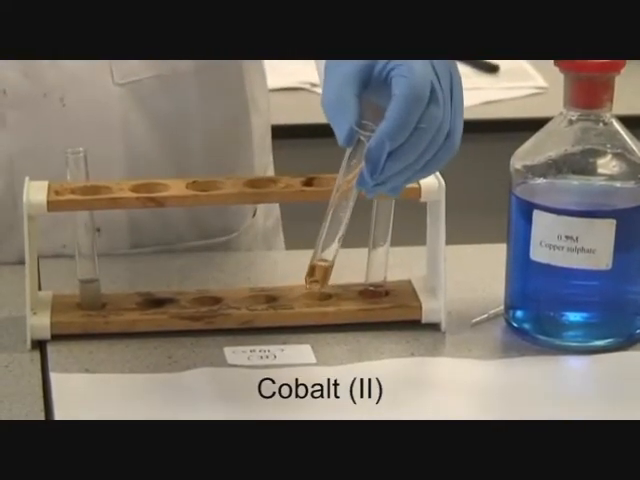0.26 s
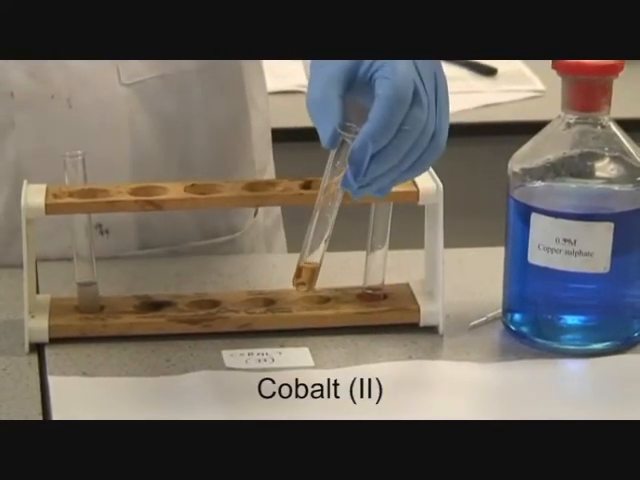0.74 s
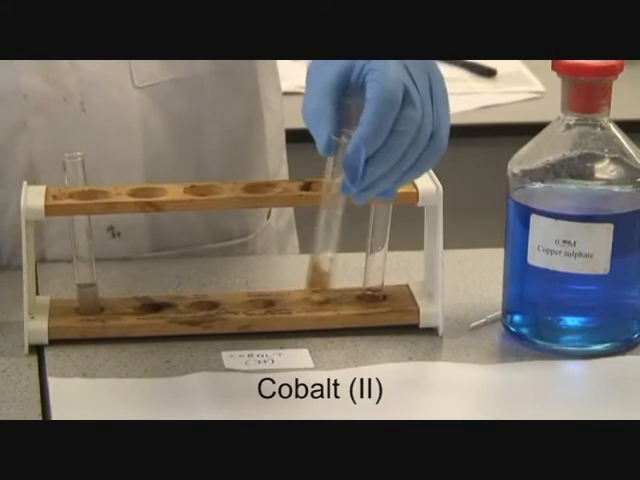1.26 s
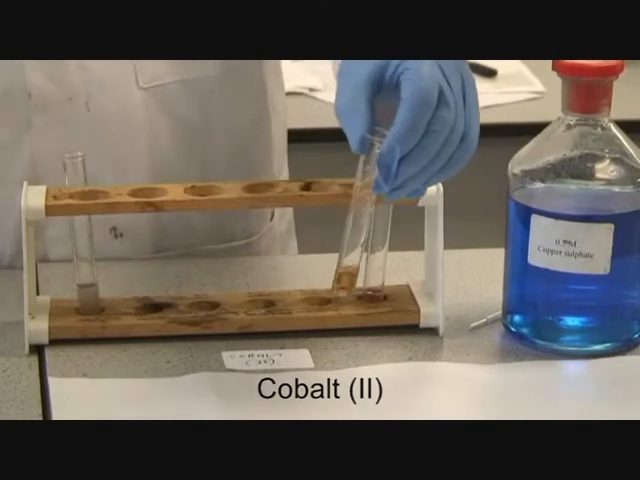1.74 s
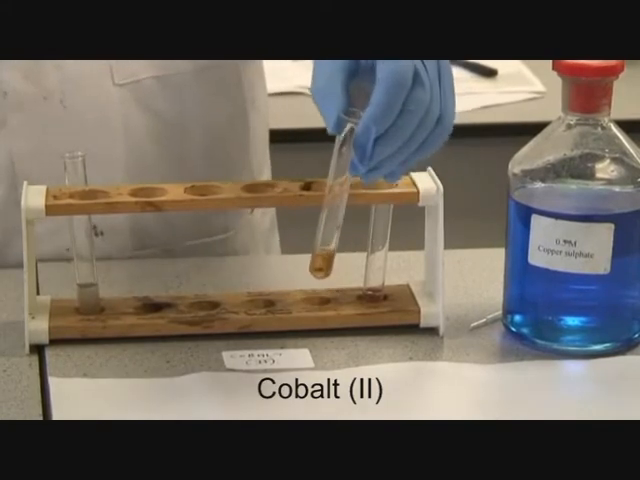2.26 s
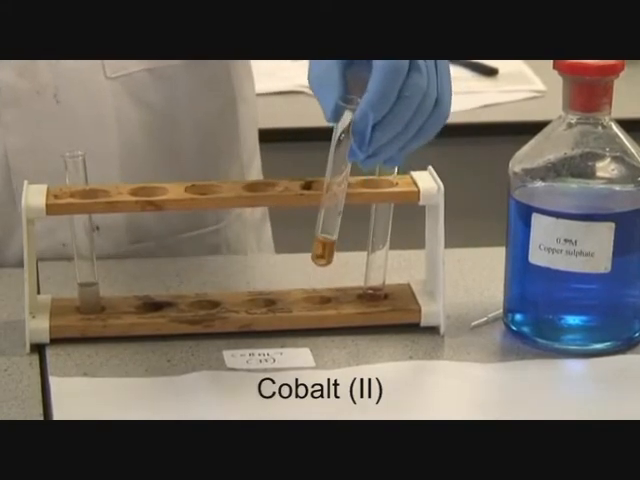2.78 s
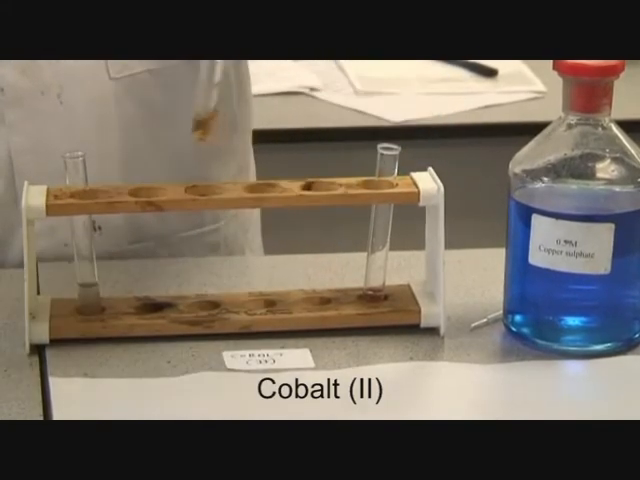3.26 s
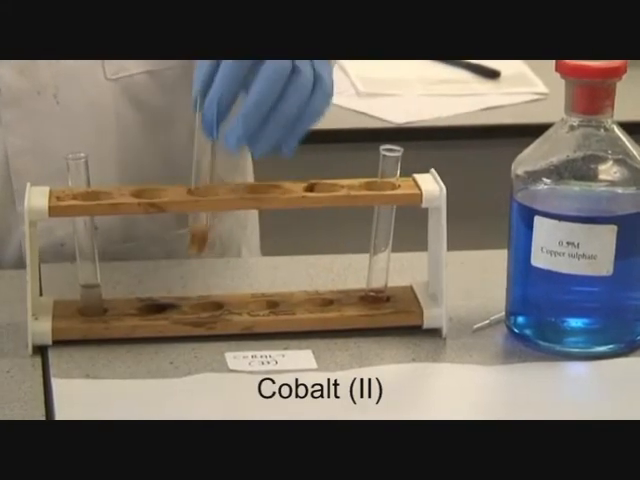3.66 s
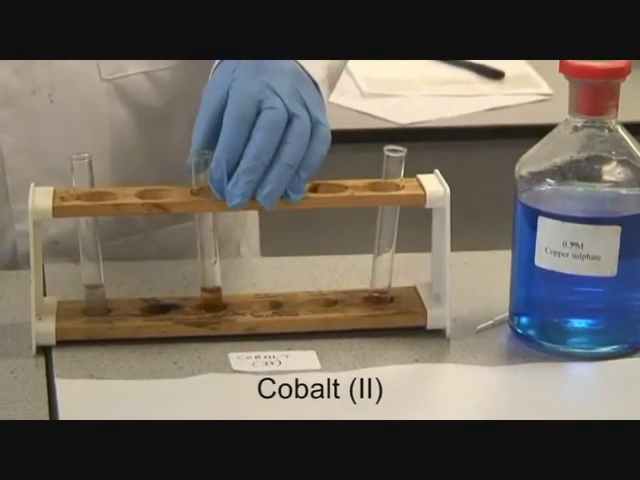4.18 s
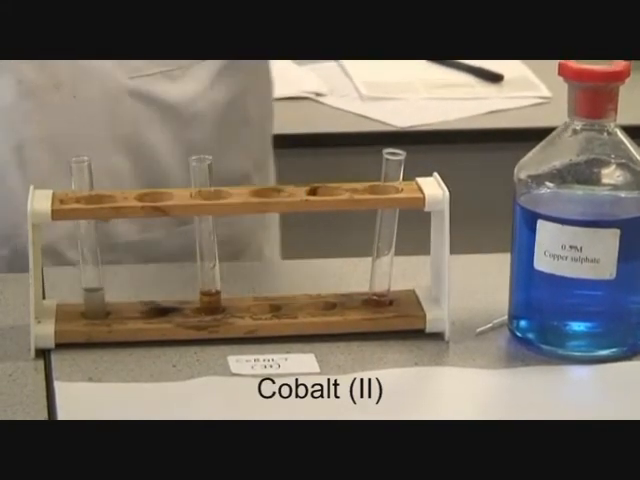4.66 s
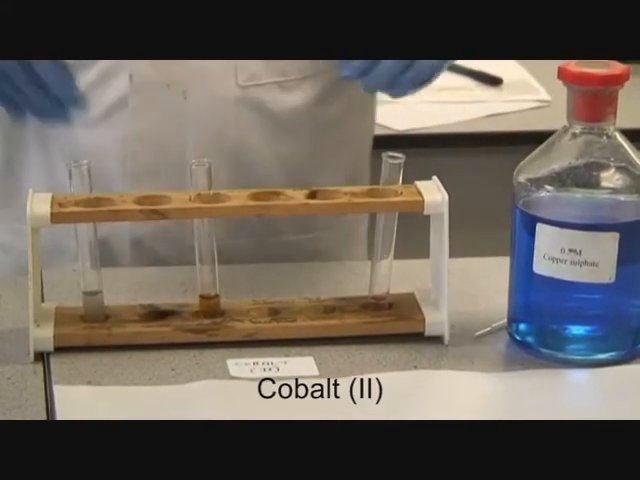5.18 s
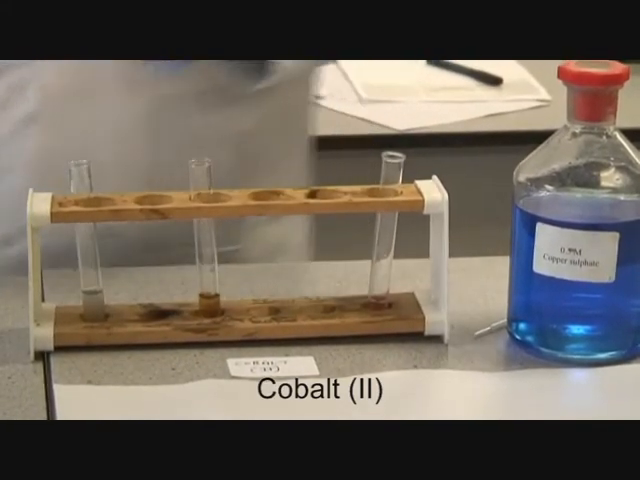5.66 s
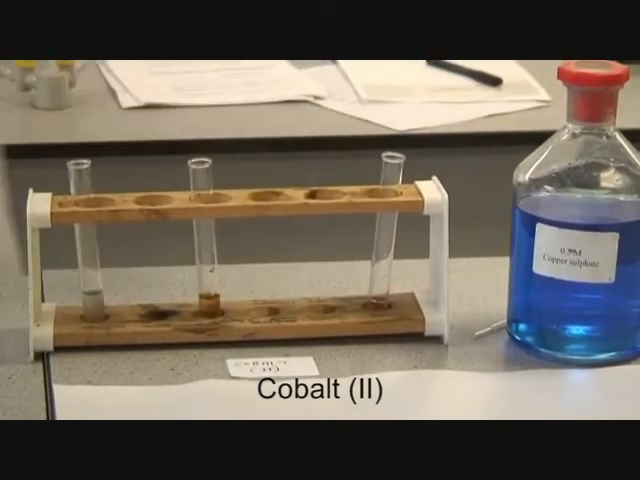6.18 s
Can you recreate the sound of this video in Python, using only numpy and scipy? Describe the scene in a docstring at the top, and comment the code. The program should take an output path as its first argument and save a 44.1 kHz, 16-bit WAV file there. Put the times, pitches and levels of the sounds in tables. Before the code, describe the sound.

A quiet laboratory room with soft low ventilation, a faint steady mains hum and light microphone hiss throughout. From about 0.6 to 1.0 s a glass tube rattles in a wooden rack: a dry knock with a tiny glassy tick, irregular smaller knocks, short gritty scrapes, and a firmer woody knock at 1.0. Between 1.3 and 2.0 only very faint cloth rubbing. A light tap with a slight glass ring at 2.4, a brief scrape near 2.65, then at 2.8 the loudest event, a bright hard wooden clack with a short hollow tube ring and room tail. Quiet until faint taps at 4.1 to 4.4. From 4.6 to 5.3 sleeve and glove rustles come in bursts, with small clicks. Soft dull bumps at 5.85, a crisp hard double tick at just under 6.0, then faint rustling until the end, around 6.3.

```python
"""A glass test tube, moved by a gloved hand, knocks and slides in a wooden rack on a laboratory bench.
Blows excite decaying modes of board and tube, hard contacts tick, and friction noise drives resonances.
A coat sleeve and gloves rustle as noise bursts shaped in spectrum and level. Two echoes and a diffuse
tail make the room; shaped noise and sines give ventilation, mains hum and microphone hiss."""
import sys
import numpy as np
from scipy import signal
from scipy.fft import rfft, irfft, next_fast_len
from scipy.io import wavfile
from scipy.ndimage import uniform_filter1d

SR = 44100
rng = np.random.default_rng(int(sys.argv[2]) if len(sys.argv) > 2 else 0)


def output_pcm(signal):
    """Save a mono or channel-first signal as 16-bit PCM at the path in sys.argv[1].

    Samples are clipped to [-1, 1] before scaling.
    """
    pcm = np.clip(np.atleast_2d(signal).T, -1, 1) * 32767
    wavfile.write(sys.argv[1], SR, np.round(pcm).astype(np.int16))


N = 283122  # length in samples

# modes of the rack's board with the bench under it: f/Hz, relative level/dB, t60/s
WOOD_MODES = [(258, -0.5, 0.034), (295, -18, 0.016), (352.4, -1, 0.076), (424, -12, 0.073),
              (494.5, 2, 0.053), (576, -2.5, 0.084), (666, 4, 0.051), (856, 5.5, 0.013), (920, -1.5, 0.052),
              (967, 5, 0.025), (1092, -0.5, 0.06), (1207, -8.5, 0.092), (1389, 4.5, 0.024),
              (1575, -3.5, 0.061), (1833, 0, 0.039), (2010, -6, 0.026), (2120, 9, 0.017),
              (2567, 5.5, 0.021), (2880, 0, 0.028), (3284, -3, 0.022), (3600, -11, 0.024),
              (4000, -2, 0.013), (4780, -0.5, 0.0053), (5130, -6, 0.053), (6050, -8, .012)]
# modes of the tube, lowest the air column inside it: f/Hz, relative level/dB, t60/s
GLASS_MODES = [(1090, 0, 0.12), (3700, 0, 0.069), (5390, 10, 0.095), (6030, 2, 0.083), (6500, -6, 0.11),
               (9500, 0, .15)]


def knock(peak_db, centre_hz, octaves, place):
    """Modal excitation: a soft blow, then uneven chatter; each mode is weighted by its shape at the place."""
    mode_hz = np.transpose(WOOD_MODES)[0]
    shape = np.cos(np.pi * np.arange(1, len(WOOD_MODES) + 1) * place)
    reach = near_to(mode_hz, centre_hz, octaves) + 0.019  # every mode is stirred a little
    board = ring(WOOD_MODES, (shape + .5 * np.sign(shape)) * reach)

    t = np.arange(1500) / SR
    u = 2 * np.pi * 1.82 * centre_hz * 2 ** octaves * t[:300]
    contact = u * np.exp(-u)  # a longer contact is duller
    blow = peaked(np.convolve(contact, board), peak_db)

    chatter_s = 2.63 / centre_hz  # decay by 1/e in 2.63 cycles of the strongest region
    force = 1.09 * rng.standard_normal(len(t)) * np.exp(-t / chatter_s) / np.sqrt(chatter_s * SR)
    force[0] = 1  # the blow itself
    return signal.fftconvolve(force, blow)


def tick(peak_db, hz, cycles):
    """Impact of hard bodies: a small contact spot radiates a short, heavily damped oscillation."""
    turns = np.arange(600) / SR * hz
    envelope = (turns / cycles) ** 2 * np.exp(-4.5 * turns / cycles)
    return peaked(np.sin(2 * np.pi * turns) * envelope, peak_db)


def clink(peak_db, centre_hz, grip):
    """Damped free vibration: tube modes near the given region sound; the grip sets how long they ring."""
    modes = np.array(GLASS_MODES) * [1, 1, grip]
    modes[0, 0] = np.clip(centre_hz, 900, 1200)  # the fingers at the mouth shift the air column
    tube = ring(modes, near_to(modes[:, 0], centre_hz, octaves=0.03))
    onset = np.minimum(np.arange(len(tube)) / 60, 1)
    return peaked(tube * onset, peak_db)


def slide(hold, swell_db, hiss_db, hiss_hz, ring_hz, board_db, board_hz):
    """Friction-driven resonance: slips on the rim hiss in one band, ring the glass and shake the board."""
    t, shape = stroke(rise=.016, hold=hold, fall_db_per_s=1200, swell_db=swell_db)
    slips = gritty(len(t), per_s=2500, spread_db=0.0, smooth=0.45)

    # hiss and rumble drop in pitch as the tube slides
    hiss_sag_hz_per_s, rumble_sag_hz_per_s = 1600, 880
    falling_hz = hiss_hz - hiss_sag_hz_per_s * (t - t.mean())
    band = resonate(resonate(slips, falling_hz, 900), falling_hz, 940)
    hiss = patchy(band, spread_db=2.8)

    top_mode_hz = GLASS_MODES[-1][0]
    tube = evened(resonate(slips, ring_hz, 130)) + 0.46 * evened(resonate(slips, top_mode_hz, 130))

    wood = sum(gain_of(db) * resonate(slips, hz, 130) for hz, db, _ in WOOD_MODES)
    board = evened(resonate(wood, board_hz - rumble_sag_hz_per_s * t, 180))

    rim = gain_of(hiss_db) * (hiss + gain_of(-9) * tube)
    return shape * (rim + gain_of(board_db) * board)


def rustle(rise, hold, level_db, folds_db):
    """Friction noise: rubbing cloth and rubber give middle grain, fine treble and duller folds below."""
    # spectrum of the rub: f/Hz, relative level per Hz/dB
    cloth = [(710, -5), (1200, 0.5), (1550, -5), (1700, -3), (1890, -3.5), (2510, 1.5), (3530, -1),
             (4640, 1.5), (5320, -8.5), (6170, -7), (7010, -22), (7710, -13.5), (8660, -19), (11300, -14),
             (15000, -46)]
    t, shape = stroke(rise, hold, fall_db_per_s=389)
    rub = coloured(gritty(len(t), per_s=2500, spread_db=2.5, smooth=1.3), cloth)
    rub = patchy(rub, spread_db=2.9)
    fine = evened(signal.sosfilt(signal.butter(4, 7000, "high", fs=SR, output="sos"), rub))
    grain = evened(signal.sosfilt(signal.butter(4, 7000, "low", fs=SR, output="sos"), rub))
    folds = evened(resonate(rng.standard_normal(len(t)), 370, 1050))
    mixed = grain + gain_of(folds_db) * folds + gain_of(-9.5) * fine
    return gain_of(level_db) * shape * mixed


def room(x):
    """Reverberation: two early reflections, then a dense tail with a decay time for each frequency."""
    # tail: f/Hz, t60/s, relative level/dB
    tail_table = [(237, 0.64, 1.5), (660, 0.39, -2.5), (1040, 0.48, -6), (1630, 0.3, -2),
                  (3130, 0.45, -7.5), (6040, 0.2, -8), (12200, 0.44, -1.5)]
    # reflections from bench and back wall: delay t/s, level/dB
    echoes = [(.004, -12), (.009, -17)]
    taps = np.zeros((2, SR // 2))
    at = np.arange(300, SR // 2 - 20, 20) + rng.integers(0, 20, (2, (SR // 2 - 301) // 20))
    np.put_along_axis(taps, at, rng.choice([-1., 1.], at.shape), 1)
    # close microphones hear nearly the same tail
    taps = taps[0] + 0.0043 * taps[1] * np.array([[1], [-1]])

    hz, t, z = signal.stft(taps, SR, nperseg=256)
    t60 = read([(f, s) for f, s, _ in tail_table], hz)[:, None]
    level_db = read([(f, db) for f, _, db in tail_table], hz)[:, None]
    response = signal.istft(z * gain_of(level_db - 60 * t / t60), SR, nperseg=256)[1]
    response *= gain_of(-4.0) / np.linalg.norm(response[0])
    for k, (s, db) in enumerate(echoes):
        response[:, round(s * SR)] += (-1) ** k * gain_of(db)  # the second is inverted
    return x + signal.fftconvolve(x[None], response, axes=1)[:, :N]


def ventilation():
    """Broadband flow noise: coloured noise whose level swells slowly and irregularly."""
    # spectrum: f/Hz, relative level per Hz/dB
    air = [(12, -58), (20, -4), (38, -22.5), (120, -11), (155, -8.5), (221, -9), (300, -9), (341, -5),
           (378, -11.5), (419, -9), (476, -16), (1050, -19), (1500, -23), (2210, -25.5), (9000, -35.5),
           (11700, -76.5), (19800, -120)]
    t = np.arange(N) / SR
    swell = evened(sum(np.sin(2 * np.pi * (f * t + rng.random())) / np.sqrt(f)
                       for f in np.geomspace(.2, 3, 12)))
    return coloured(rng.standard_normal(N), air) * gain_of(-61 + 0.6 * swell)


def mains_hum():
    """Line spectrum: narrow noise bands waver as hum, and steady sines add thin tones."""
    # hum lines: f/Hz, rms level/dB, width/Hz
    lines = [(149.8, -62, 1.4), (199, -72, 9), (306, -68.5, 14), (591, -79, 3.4), (906, -88, 2.7),
             (1130, -81, 7.2)]
    # thin tones: f/Hz, rms level/dB
    buzz = [(3300, -93), (3600, -93), (4200, -92), (4500, -93), (9900, -93), (11100, -94)]
    t = np.arange(N) / SR
    hum = np.zeros(N)
    for k, (hz, db, width) in enumerate(lines):
        line = evened(resonate(rng.standard_normal(N), hz, width))
        if k == 0:  # the strongest line is mostly a steady tone, over the level listed
            line = np.sqrt(2) * np.sin(2 * np.pi * hz * t) + 0.36 * line
        hum += gain_of(db) * line
    for hz, db in buzz:
        hum += gain_of(db) * np.sqrt(2) * np.sin(2 * np.pi * hz * t)
    return hum


def ring(modes, weights):
    """Modal superposition: exponentially decaying sines, a quarter second long."""
    hz, db, t60 = np.transpose(modes)
    t = np.arange(SR // 4)[:, None] / SR
    return (weights * gain_of(db - 60 * t / t60) * np.sin(2 * np.pi * hz * t)).sum(1)


def near_to(hz, centre_hz, octaves):
    """Selective excitation: Gaussian weight of modes around a centre on the octave scale."""
    return np.exp(-.5 * (np.log2(hz / centre_hz) / max(octaves, .03)) ** 2)


def gritty(size, per_s, spread_db, smooth):
    """Stick-slip friction: random uneven micro-slips over a smooth noise."""
    slips = gain_of(spread_db * np.minimum(rng.exponential(1, size), 5)) * (rng.random(size) < per_s / SR)
    return evened(slips * rng.standard_normal(size)) + smooth * rng.standard_normal(size)


def stroke(rise, hold, fall_db_per_s, swell_db=0):
    """Envelope linear in dB: rises from silence, holds with a swell centred on 0 dB, and falls."""
    depth_db = 26
    corners = np.cumsum([0, rise, hold, depth_db / fall_db_per_s])
    t = np.arange(0, corners[-1], 1 / SR)
    level_db = np.interp(t, corners, [-depth_db, -swell_db / 2, swell_db / 2, -depth_db])
    return t, gain_of(level_db) - gain_of(-depth_db)


def patchy(x, spread_db):
    """Uneven pressure: the level wanders in patches of time and pitch; rms 1."""
    z = signal.stft(x, nperseg=256)[2]
    patches = uniform_filter1d(rng.standard_normal(z.shape), size=6, axis=0)
    patches = evened(uniform_filter1d(patches, size=5, axis=1))
    return evened(signal.istft(z * gain_of(spread_db * patches), nperseg=256)[1][:len(x)])


def resonate(x, hz, width):
    """Heterodyne resonance of peak gain 1: shift hz down to zero, smooth, and shift back."""
    turn = np.exp(2j * np.pi * np.cumsum(hz * np.ones(len(x))) / SR)
    r = np.exp(-np.pi * width / SR)
    return 2 * (turn * signal.lfilter([1 - r], [1, -r], x / turn + 1e-18)).real


def coloured(x, points):
    """Spectral shaping: weights x by a level curve in dB over frequency, then sets rms 1."""
    length = x.shape[-1]
    size = next_fast_len(length)
    gain = gain_of(read(points, np.fft.rfftfreq(size, 1 / SR)))
    return evened(irfft(rfft(x, size) * gain, size)[..., :length])


def read(points, hz):
    """Interpolates a curve on a log-frequency axis."""
    f, value = np.transpose(points)
    return np.interp(np.log(hz + 1), np.log(f + 1), value)


def gain_of(db):
    """Level to amplitude: 20 dB is a factor of ten."""
    return 10 ** (np.asarray(db) / 20)


def evened(x):
    """Power normalisation: scales to rms 1."""
    return x / np.sqrt(np.mean(x ** 2) + 1e-20)


def peaked(x, peak_db):
    """Peak normalisation: scales to a peak level."""
    return gain_of(peak_db) * x / abs(x).max()


def add(mix, s, sound):
    """Linear superposition: mixes a sound in at a time in seconds."""
    part = mix[round(s * SR):][:len(sound)]
    part += sound[:len(part)]


def scene():
    """Superposition: rack, tube and cloth excite the room, over the background."""
    # knocks on wood: t/s, blow's peak level/dB, strongest region f/Hz, breadth/octaves, place on board (0-1)
    knocks = [(.582, -23, 760, 1.17, 0.4), (.597, -31.5, 890, 0.46, .21), (.621, -38, 750, 0.45, 0.29),
              (.650, -43, 990, 0.36, 0.25), (.660, -28.5, 965, 0.69, .33), (.665, -29, 980, 0.29, .38),
              (.712, -30.5, 790, .97, 0.4), (.795, -36, 745, .2, 0.17), (.847, -27.5, 780, 0.4, 0.09),
              (.866, -39, 760, 1, .51), (.906, -33.5, 600, 0.37, .15), (.983, -18.5, 835, 0.78, .32),
              (2.421, -30, 1180, 0.59, 0.08), (2.694, -38.5, 730, .63, 0.43), (2.769, -38, 660, 0.71, 0.5),
              (2.776, -42, 700, 0.55, 0.37), (2.81, -26.5, 720, 0.33, 0.07), (2.814, -27, 724, 0.44, 0.21),
              (2.821, -13, 1170, 0.88, .37), (2.8238, -15, 1330, 1.5, 0.32), (4.079, -48, 605, .4, 0.31),
              (4.306, -41.5, 1020, 0.9, .4), (4.38, -50, 1070, 0.81, .39), (4.624, -36.5, 990, .45, .2),
              (4.812, -43, 520, 0.28, 0.12), (5.846, -35, 281, 0.76, 0.08), (5.865, -41, 420, 1.9, 0.14),
              (5.984, -36.5, 1080, 1.4, .32), (5.989, -43, 980, .47, .3), (6.018, -53, 516, .45, 0.23),
              (6.275, -51.5, 1130, 0.69, 0.44)]
    # hard ticks of glass rims and gloves: t/s, peak level/dB, f/Hz, length/cycles
    ticks = [(.5825, -27, 3430, 1.9), (.5826, -42, 6500, 3.2), (.651, -55, 4500, 1.5),
             (.712, -38.5, 3700, 1), (2.421, -34, 4430, 1.5), (2.694, -50, 6000, 1.2),
             (4.585, -46, 2900, 5.5), (4.624, -41.5, 3800, 1.4), (4.634, -36, 4470, 0.44),
             (4.811, -33, 4360, 2.5), (4.998, -46, 3340, 2.8), (5.07, -43, 4000, 1),
             (5.235, -50, 3040, 1.4), (5.866, -49, 5000, 1.5), (5.9848, -20, 4180, 1.18),
             (5.9893, -27.5, 4330, 1.1)]
    # rings of the tube: t/s, peak level/dB, mode region f/Hz, grip as a factor on t60
    clinks = [(.584, -50.5, 5383, 1.9), (.585, -48, 3671, 0.79), (.586, -62, 6540, .9),
              (.651, -59, 6540, .9), (.679, -68, 6540, .9), (.712, -59, 7060, 0.78),
              (2.422, -46, 5383, 0.37), (2.423, -56, 6170, 0.72), (2.426, -43, 1124, 0.51),
              (2.83, -33, 1007, 1.9), (4.312, -50.5, 1059, 1.2), (4.382, -57, 1064, 0.81)]
    # slides of the tube in its hole: start t/s, hold/s, swell over the hold/dB, hiss level/dB,
    # hiss band f/Hz, ring f/Hz as the grip shifts it, board rumble level/dB, rumble's starting f/Hz
    slides = [(.62, 0.048, -7, -66, 3620, 6530, -49, 880),
              (.762, 0.093, 5.5, -57.5, 3650, 6380, -51.5, 710),
              (.886, 0.034, -1, -84, 3700, 6280, -58, 570), (2.635, .035, -4, -71.5, 3850, 6150, -61, 1150),
              (2.76, 0.031, -8, -54, 4140, 6000, -47.5, 670)]
    # strokes of sleeve and gloves: start t/s, rise/s, hold/s, grain level/dB, folds against grain/dB
    rustles = [(1.325, 0.019, 0.0055, -68, 4), (1.42, 0.041, .13, -69.5, 0.5), (1.8, 0.16, 0.069, -72, -2),
               (4.628, 0.0073, 0.0024, -58, -2.5), (4.655, 0.042, 0.14, -56.5, -14),
               (4.788, 0.015, 0.011, -50, 2.5), (4.86, 0.052, 0.089, -62.5, -12),
               (5.045, 0.014, 0.11, -63, -2), (5.19, 0.039, .12, -59.5, -14), (5.995, 0.011, 0.22, -77, 10),
               (6.22, 0.036, 0.037, -65, 0), (6.29, 0.038, 0.031, -59, -8)]
    near = np.zeros(N)
    for table, source in [(knocks, knock), (ticks, tick), (clinks, clink), (slides, slide), (rustles, rustle)]:
        for s, *settings in table:
            add(near, s, source(*settings))
    # small things radiate little bass
    near = signal.sosfilt(signal.butter(2, 190, "high", fs=SR, output="sos"), near)
    return room(near) + ventilation() + mains_hum()


def record(dry):
    """Noise floor and band limit: two microphones add hiss, part of it shared, then a low-pass acts."""
    # hiss of each microphone: f/Hz, relative level per Hz/dB
    hiss = [(12, -35.5), (20, 3.5), (140, -1.5), (296, -5), (391, -9.5), (952, -12.5), (1290, -18),
            (4390, -12.5), (14100, -12.5), (15300, -48)]
    own = coloured(rng.standard_normal((2, N)), hiss)
    shared = coloured(rng.standard_normal(N), [(2000, -22), (5000, -17.5), (9000, -13.5), (15500, -11.0)])
    heard = dry + gain_of(-67.5) * own + gain_of(-70.0) * shared
    low_pass = signal.firwin(511, 15500, window=("kaiser", 9), fs=SR)
    return signal.oaconvolve(heard, low_pass[None], "same")


dry = scene()
out = record(dry)
output_pcm(out)
```